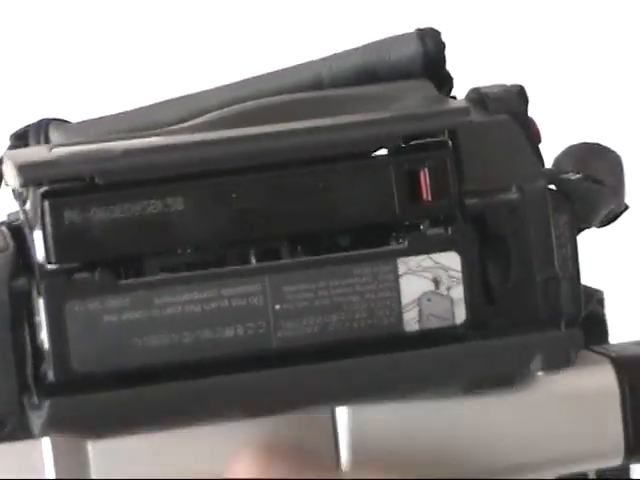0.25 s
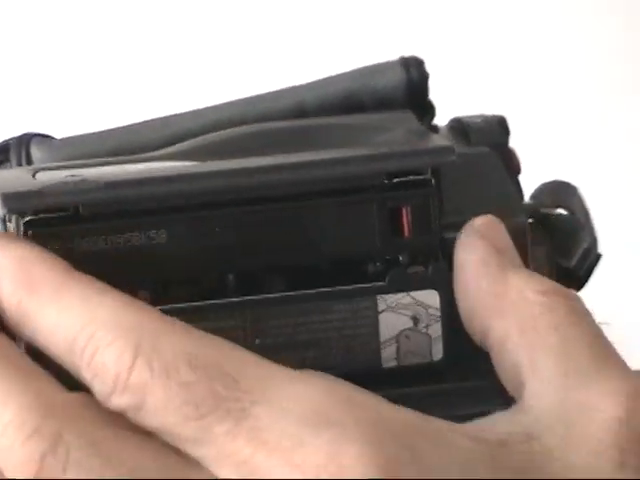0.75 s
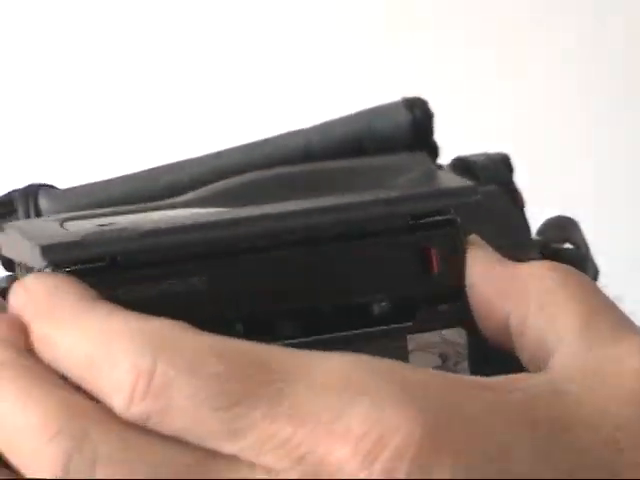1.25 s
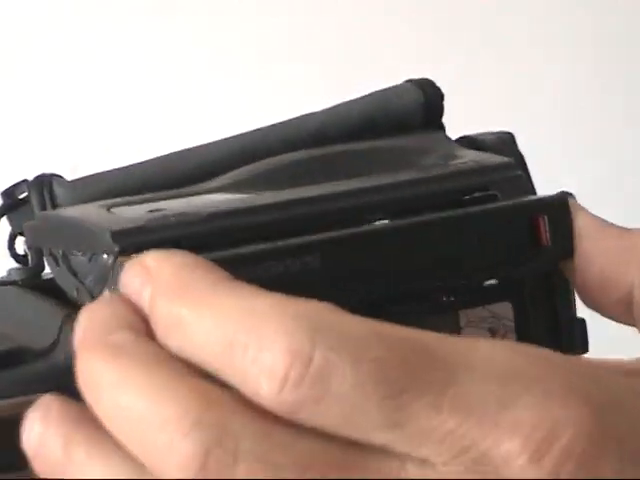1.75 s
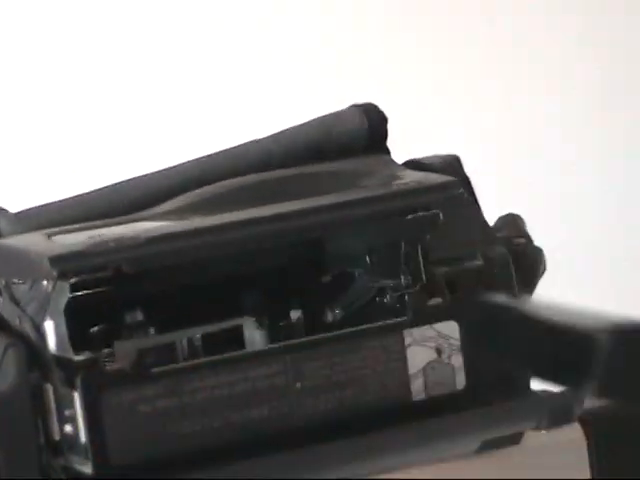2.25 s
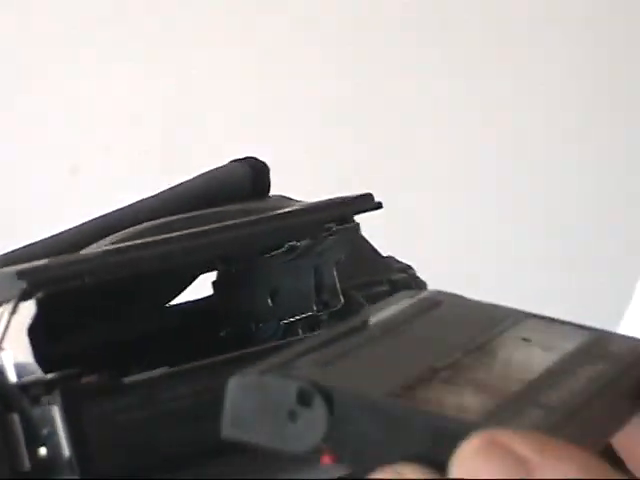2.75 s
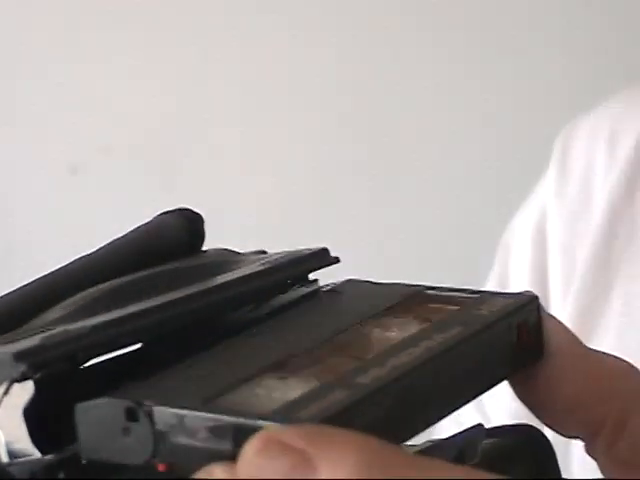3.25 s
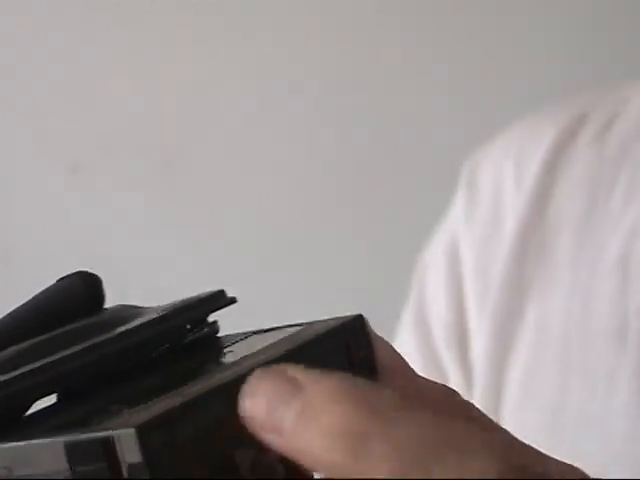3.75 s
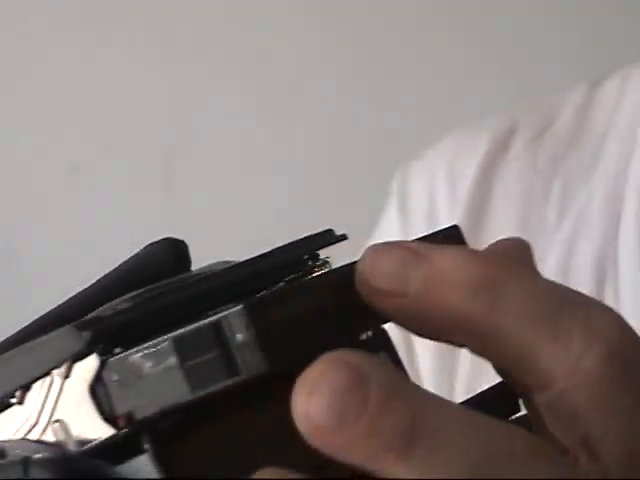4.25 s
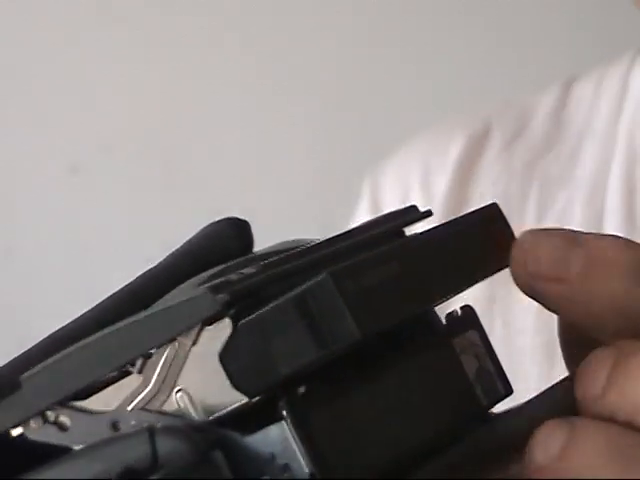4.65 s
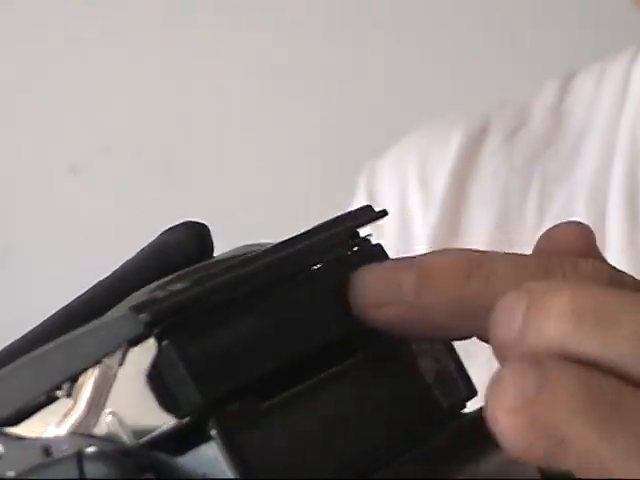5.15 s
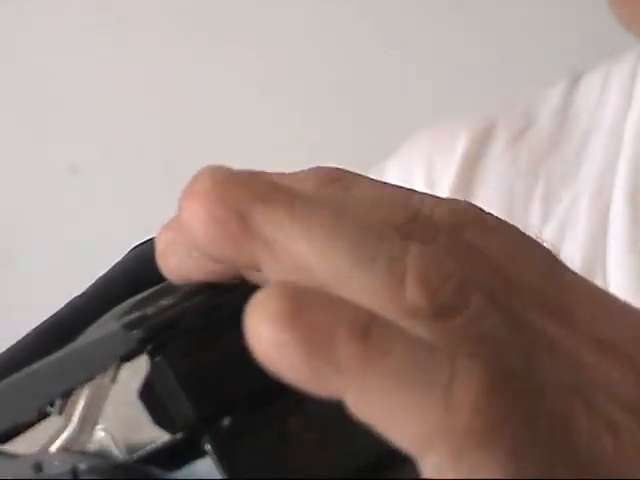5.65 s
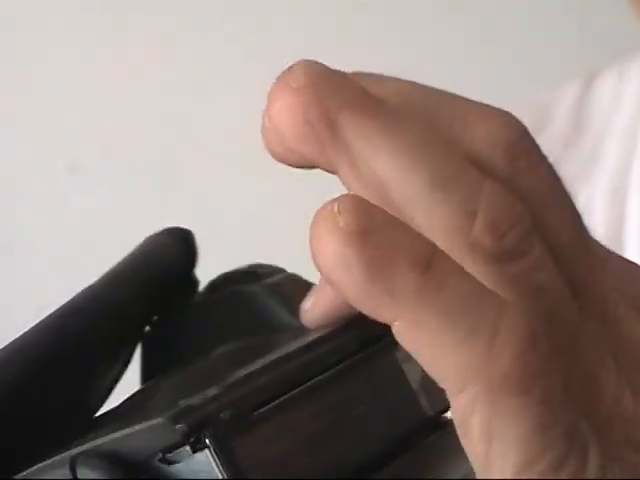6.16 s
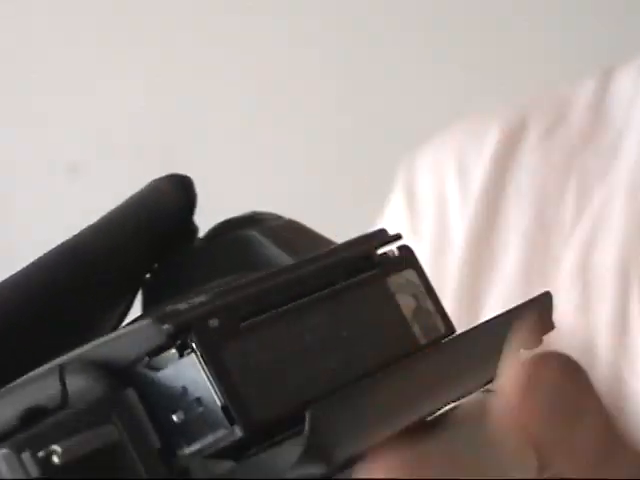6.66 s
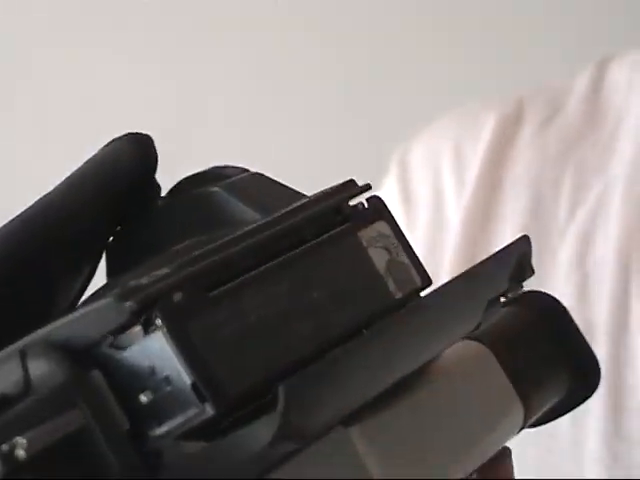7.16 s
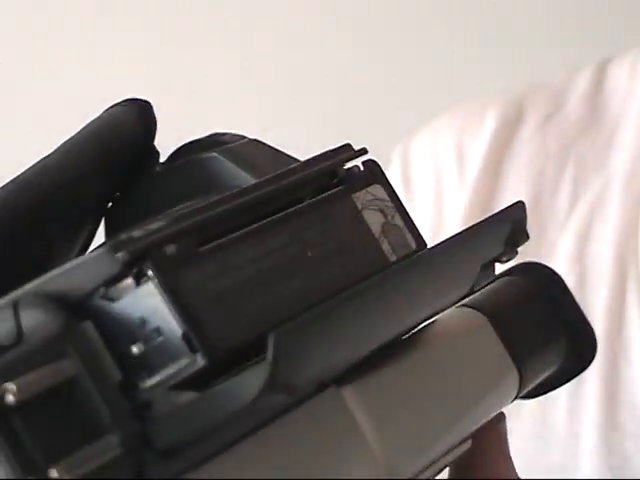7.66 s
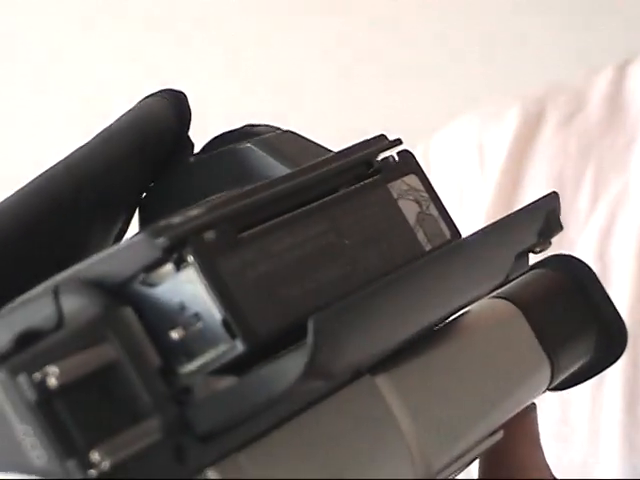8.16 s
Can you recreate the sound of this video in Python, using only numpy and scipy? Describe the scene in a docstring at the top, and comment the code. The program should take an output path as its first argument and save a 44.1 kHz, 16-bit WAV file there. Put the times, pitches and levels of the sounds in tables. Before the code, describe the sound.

Hands swap a tape in a small camcorder: light rattles, sliding plastic, one sharp hard snap, a second clack, and steady whirring hiss behind.

```python
"""Cassette changed in a camcorder

Small room, microphone close: hands pull a cassette out, slide it in again, snap the carriage shut and latch it.
Rough forces ring the small parts, hollow case, panels and sharp edges; a hand brushes the shell as soft noise.
The room returns a near echo and a tail of about half a second.
Behind it all, wavering sine lines make the whine of the tape drive, and noise makes a steady, throbbing hiss."""
import sys
import numpy as np
from scipy import signal
from scipy.fft import rfft, irfft
from scipy.io import wavfile

SR = 44100
rng = np.random.default_rng(int(sys.argv[2]) if len(sys.argv) > 2 else 0)


def pcm_store(signal):
    """Save signal as 16-bit PCM."""
    levels = np.round(np.clip(np.atleast_2d(signal), -1, 1) * 32767)
    wavfile.write(sys.argv[1], SR, levels.astype(np.int16).T)


N = 370440  # 8.4 s
DRUM_HZ = 149.9  # turning rate of the tape drum

# Parts meeting, close to the microphone: cassette out from 1.4 s, in from 3.1 s, carriage shut at 5.06 s,
# pressed down and latched from 6.0 s. Columns: t/s, crack level/dB, kind of touch
CLICKS = [(0.294, -41, "click"), (0.3005, -43, "click"), (0.3645, -39, "click"), (0.3705, -37.5, "click"),
          (0.3825, -42, "snap"), (0.6795, -51.5, "tap"), (0.7928, -42.5, "tap"), (1.3955, -49.5, "knock"),
          (1.4432, -44, "click"), (1.7148, -42.5, "tap"), (1.7795, -44.5, "knock"), (1.8772, -47, "tap"),
          (3.0925, -39, "tap"), (3.1692, -32.5, "tap"), (3.2386, -44, "knock"), (3.2656, -40.5, "tap"),
          (3.382, -46.5, "slam"), (3.4075, -33.5, "knock"), (3.4105, -33.5, "tap"), (3.4297, -36, "tap"),
          (3.44, -43.5, "clack"), (3.474, -48, "clack"), (3.8507, -51.5, "knock"), (3.9072, -47.5, "knock"),
          (3.9425, -38, "knock"), (3.9555, -40, "slam"), (4.381, -37.5, "knock"), (4.3875, -38.5, "snap"),
          (4.4135, -41, "slam"), (4.7722, -51, "knock"), (5.047, -40, "knock"), (5.059, -29.5, "snap"),
          (5.0626, -12, "snap"), (5.0743, -25, "slam"), (5.441, -45.5, "knock"), (6.0185, -42.5, "tap"),
          (6.0258, -43.5, "slam"), (6.0647, -31, "snap"), (6.079, -38, "snap"), (6.0963, -37.5, "slam"),
          (6.1135, -35, "clack"), (6.1155, -26, "slam"), (6.1237, -17.5, "slam"), (6.1275, -18.5, "snap"),
          (6.3706, -37, "latch"), (6.4143, -44.5, "knock"), (6.4274, -52, "slam"), (6.8485, -52, "latch"),
          (6.8938, -36.5, "latch")]
# How plastic meets plastic, by kind.
# Columns: case knock, panel clack, bright edge (each level/dB re the crack), chatter decay t/s
TOUCH = {"click": (-9, -14, -10, 0.0032), "tap": (-18, -1, -6, 0.0024), "knock": (3, 1.5, -13, 0.0026),
         "clack": (7, 14, -11, 0.003), "snap": (-4.5, -8, 1, 0.0045), "slam": (-0.5, -2, 2.5, 0.0027),
         "latch": (-24, -26, 4, 0.0026)}


def clicks(responses, rise_s=0.00027, lasts_s=.0058, push=0.6):
    """Each click is a short central push and a chatter of tiny contacts that dies away within milliseconds."""
    out = np.zeros((2, N))
    t = np.arange(2048) / SR
    # the push lasts 0.7 ms and begins 0.7 ms after the chatter
    push_shape = np.sin(np.pi * np.clip(t / .0007 - 1, 0, 1)) ** 2
    blow = np.outer([push, 0], push_shape)
    chatter = rng.standard_normal((len(CLICKS), 2, len(t)))
    for (start_s, db, kind), noise in zip(CLICKS, chatter):
        *parts_db, decay_s = TOUCH[kind]
        envelope = (1 - np.exp(-t / rise_s)) * np.exp(-t / decay_s)
        force = blow + noise * envelope
        add(out, start_s, contact(force, lasts_s, db, parts_db, responses))
    return out


# Plastic sliding on plastic, close by. Columns: start t/s, end t/s, scrape level/dB, way of sliding
SLIDES = [(0.39, 0.46, -57, "light"), (0.61, 0.68, -58.5, "light"), (1.38, 1.53, -56, "firm"),
          (1.66, 1.79, -53.5, "firm"), (1.76, 1.9, -50, "firm"), (3.08, 3.2, -57, "firm"),
          (3.23, 3.34, -61.5, "hollow"), (3.385, 3.46, -45.5, "firm"), (3.42, 3.521, -52, "hollow"),
          (3.915, 3.997, -43, "firm"), (4.371, 4.407, -36, "light"), (4.393, 4.457, -42, "firm"),
          (5.0, 5.06, -47.5, "firm"), (5.035, 5.066, -37.5, "firm"), (5.39, 5.5, -54, "light"),
          (6.012, 6.067, -53, "firm"), (6.049, 6.135, -39, "firm"), (6.375, 6.41, -56, "firm"),
          (6.82, 6.89, -59, "light")]
# How the parts answer each way of sliding. Columns: case knock, panel clack, bright edge (level/dB re the scrape)
RUB = {"light": (-6, -6, -3), "firm": (1.5, -0.5, -5.5), "hollow": (15, 11, -6)}


def slides(responses, slips_per_s=1600, slip_db=4.5, smooth=0.27, fullness=0.36):
    """Sliding parts stick and slip: uneven little catches over a smooth rub, swelling and fading."""
    out = np.zeros((2, N))
    caught = rng.random(N) < slips_per_s / SR
    catch_gain = amp(slip_db * np.minimum(rng.exponential(1, N), 3))
    friction = (caught * catch_gain + smooth) * rng.standard_normal((2, N))
    for start_s, end_s, db, kind in SLIDES:
        force = friction[:, round(start_s * SR):round(end_s * SR)]
        stroke = np.sin(np.linspace(0, np.pi, force.shape[1]))
        lasts_s = fullness * len(stroke) / SR
        add(out, start_s, contact(force * stroke, lasts_s, db, RUB[kind], responses))
    return out


# The carriage snapping shut jolts the whole body. Columns: t/s, level/dB rms
JOLTS = [(5.063, -41.5)]
# The dull push of a jolt. Columns: f/Hz, level/dB
JOLT_COLOUR = [(15, -4), (40, -2), (90, -2.5), (190, -20.5), (300, 2), (400, -1), (540, 15.5), (700, -2.5),
               (1500, -44.5), (4000, -72)]


def jolts(decay_s=0.013):
    """A short, low shudder of the body: dying noise in a dull colour, alike in both channels."""
    out = np.zeros((2, N))
    t = np.arange(2048) / SR
    for start_s, db in JOLTS:
        dying_noise = rng.standard_normal(len(t)) * np.exp(-t / decay_s)
        push = np.convolve(dying_noise, causal(JOLT_COLOUR, size=2048))[:len(t)]
        add(out, start_s, amp(db) * np.array([unit(push)] * 2))
    return out


# A hand brushing along the cassette as it is turned, close by. Columns: t/s, level/dB
BRUSH = [(2.56, -71), (2.615, -48.5), (2.65, -45), (2.69, -42), (2.725, -44.5), (2.755, -53.5), (2.82, -64)]
# Colour of skin on the shell. Columns: f/Hz, level/dB
BRUSH_COLOUR = [(150, -23), (350, -11), (800, -7.5), (1500, -3.5), (2900, -8), (4600, -2), (6000, -8),
                (7200, -10.5), (8200, -18.5), (9600, -15), (12500, -29.5), (16000, -32)]


def brush(side_db=-10, patchy_db=0.7):
    """Skin sliding over the smooth shell: a soft, slightly patchy swish of noise."""
    times_s, levels_db = np.transpose(BRUSH)
    level_db = np.interp(np.arange(N) / SR, times_s, levels_db, left=-120, right=-120)
    level_db = level_db + patchy_db * drift(90)
    swish = unit(colour(rng.standard_normal((2, N)), BRUSH_COLOUR))
    return amp(level_db) * spread(swish, side_db)


# The crowded modes of small stiff parts. Columns: f/Hz, level/dB
CRACK = [(30, -25.5), (200, -48), (600, -18), (1200, -11.5), (1700, 2), (2200, 1), (2700, 1.5), (3600, 2),
         (5600, -3), (6800, -21.5), (9000, -44.5)]
# Lingering rings of the stiff metal frame and its springs. Columns: f/Hz, width f/Hz, level/dB re the crack
FRAME = [(1834, 32, -23), (2119, 22, -19.5), (2327, 40, -20), (3850, 28, -23), (4190, 26, -21.5),
         (5070, 35, -19.5), (6350, 70, -20), (7940, 65, -18.5), (10000, 70, -23)]
# Resonances of the hollow case. Columns: f/Hz, width f/Hz, level/dB
CASE = [(315, 80, -20.5), (522, 40.5, -5), (648, 110.5, -2.5), (810, 73, 7.5), (934, 70.3, -2)]
# Resonances of the thin plastic panels. Columns: f/Hz, width f/Hz, level/dB
PANELS = [(1093, 82, -1), (1180, 170, -6), (1258, 70, -1.5), (1437, 60, -4.5), (1595, 64, -4.5)]
# The sharpest edges of the small parts. Columns: f/Hz, level/dB
EDGE = [(3500, -49.5), (5400, -5.5), (6300, 0.5), (7400, -2.5), (8300, -1), (10200, -1), (12000, -10.5),
        (14000, -17), (16000, -29)]


def plastic():
    """Impulse responses of the small parts with their ringing frame, the hollow case, the panels and the edges."""
    t = np.arange(2048) / SR
    crack = unit(causal(CRACK, size=2048))
    rings = 0
    for hz, width_hz, db in FRAME:
        ring = np.exp(-np.pi * width_hz * t) * np.sin(2 * np.pi * hz * t)
        rings = rings + amp(db) * unit(ring)
    return crack + rings, modes(CASE), modes(PANELS), causal(EDGE)


def modes(table):
    """Impulse response of a few damped modes; their skirts fall away steeply on both sides."""
    t = np.arange(2048) / SR
    ring = 0
    for k, (hz, width_hz, db) in enumerate(table):
        sign = (-1) ** k  # neighbouring modes start in opposite directions
        damped = np.exp(-np.pi * width_hz * t) * np.sin(2 * np.pi * hz * t)
        ring = ring + sign * amp(db) * width_hz * damped
    edges_hz = [.8 * table[0][0], 1.25 * table[-1][0]]
    skirts = signal.butter(2, edges_hz, "bandpass", fs=SR, output="sos")
    return signal.sosfilt(skirts, ring)


def contact(force, lasts_s, db, parts_db, responses, sides_db=(-15, -25, -18, -11)):
    """A rough force rings each part at its own level; the case is narrowest in stereo, the bright edge widest."""
    out = 0
    length = force.shape[1] + 2048
    padded = np.pad(force, ((0, 0), (0, 2048)))
    for part_db, response, side_db in zip([0, *parts_db], responses, sides_db):
        ring = signal.fftconvolve(padded, response[None], axes=1)[:, :length]
        # energy of a sound of rms 1 that lasts lasts_s
        energy = np.sum(ring ** 2, axis=1, keepdims=True)
        ring *= np.sqrt(lasts_s * SR / (energy + 1e-20))
        out = out + amp(db + part_db) * spread(ring, side_db)
    return out


def room(x, steady=.55):
    """The low notes feed the room evenly; part of the highs alternates between two other paths, 130 times a second."""
    high = colour(x, [(1, -80), (1300, -40), (1700, 0), (20000, 0)])
    turn = 2 * np.pi * 130 * np.arange(N) / SR
    flicker = np.sqrt(1 - steady ** 2) * high
    feeds = x - (1 - steady) * high, flicker * np.cos(turn), flicker * np.sin(turn)
    # each feed has a room response of its own
    return sum(signal.fftconvolve(feed, room_response(), axes=1)[:, :N] for feed in feeds)


# Time for the small room's tail to fall 60 dB. Columns: f/Hz, t/s
ROOM_T60 = [(200, 0.39), (900, .5), (2500, 0.48), (5500, 0.45), (10000, 0.44), (16000, 0.21)]
# Colour of the room. Columns: f/Hz, level/dB
ROOM_COLOUR = [(100, -4.5), (500, 3), (780, -4), (950, 4), (1200, 1.5), (2500, 3), (5500, -1), (9000, -8),
               (16000, 4.5)]


def room_response(wet_db=-9.0, early_db=-14, echo_s=.0108, echo_decay_s=0.0028, build_s=0.0038, side_db=-8):
    """A near surface throws the sound back once; the room's tail builds and dies, the top treble fastest."""
    t = np.arange(SR) / SR
    # about 5000 random reflections a second
    taps = rng.choice([-1., 1.], (2, SR)) * (rng.random((2, SR)) < 5000 / SR)
    hz, frame_s, z = signal.stft(taps, SR, nperseg=256)
    fall_db = 60 * frame_s / read(ROOM_T60, hz)[:, None]
    z = z * amp(read(ROOM_COLOUR, hz)[:, None] - fall_db)
    diffuse = signal.istft(z, SR, nperseg=256)[1][:, :SR]
    tail = diffuse * (1 - np.exp(-(t / build_s) ** 2))
    echo = diffuse * (t > echo_s) * np.exp(-abs(t - echo_s) / echo_decay_s)
    tail = amp(wet_db) * tail / np.linalg.norm(tail[0])
    echo = amp(early_db) * echo / np.linalg.norm(echo[0])
    return spread(tail + echo, side_db)


def whine(waver_db=1.3, wander_rad=.6, trim_db=-1, port_phase_rad=.5):
    """Thin sine lines of the tape drive, each wavering a little in level and phase."""
    t = np.arange(N) / SR
    out = np.zeros((2, N))
    for hz, db in drive_lines():
        phase = 2 * np.pi * hz * t + wander_rad * drift(14)
        level = amp(db + trim_db + waver_db * drift(8.7))
        offset = port_phase_rad * rng.standard_normal((2, 1))  # left and right differ
        out += level * np.sqrt(2) * np.sin(phase + offset)
    return out


# Hum of the tape drive and single tones of its gears. Columns: f/Hz, level/dB rms before the whine's trim
HUM = [(120, -72), (148, -71.5), (298, -66.5), (524, -73.5), (1141, -68), (3140, -73.5), (3365, -69),
       (4260, -75)]
# Whines of the drive with sidebands spaced by the drum's turning rate.
# Columns: centre f/Hz, level/dB rms before the whine's trim, fall per sideband level/dB
WHINE = [(1873, -69.5, 1.5), (2622, -64.5, 3), (3819, -72, 7), (5769, -80, 1.5)]


def drive_lines(count=2):
    """The hum, and each whine with the sidebands that the turning drum gives it: rows of f/Hz, level/dB."""
    lines = list(HUM)
    for hz, db, fall_db in WHINE:
        for k in range(-count, count + 1):
            lines.append((hz + k * DRUM_HZ, db - fall_db * abs(k)))
    return lines


# Colour of the steady hiss. Columns: f/Hz, relative level/dB per Hz
HISS = [(20, -5.5), (60, -1.5), (130, -3.5), (200, -4.5), (320, -1), (800, -3.4), (1400, -6.5), (2500, -9),
        (3400, -12.5), (4300, -11), (5100, -17.5), (6300, -18), (7500, -21.0), (16000, -28)]
# Left-right likeness of the hiss. Columns: f/Hz, correlation (1 = alike, 0 = unrelated)
HISS_SAME = [(60, 0.06), (130, 0.18), (290, 0.33), (640, 0.43), (1410, 0.17), (3100, 0.54), (6820, 0.17),
             (15000, -0.15)]
# Balance of the hiss. Columns: f/Hz, left minus right level/dB
HISS_SIDE = [(60, -2.0), (110, -2.0), (200, -0.43), (380, -1.5), (700, -0.5), (1290, -1.5), (2380, -2.0),
             (4400, 0.0), (8120, -0.5), (15000, 0.5)]


def hiss(level_db=-54.08, throb=.2):
    """Steady noise, widest in the deep bass and top treble; its upper part throbs with every turn of the drum."""
    hz = np.fft.rfftfreq(N, 1 / SR)
    a, b = rfft(rng.standard_normal((2, N)))
    same = read(HISS_SAME, hz)
    right = same * a + np.sqrt(1 - same ** 2) * b
    balance = amp(np.outer([.5, -.5], read(HISS_SIDE, hz)))
    noise = colour(irfft(np.array([a, right]) * balance, N), HISS)
    upper = signal.sosfilt(signal.butter(1, 1200, "highpass", fs=SR, output="sos"), noise)
    turn = 2 * np.pi * DRUM_HZ * np.arange(N) / SR
    noise = noise + throb * upper * (np.cos(turn) + np.cos(2 * turn))
    return amp(level_db) * noise / np.std(noise.mean(0))


def amp(db):
    """Decibels to gain."""
    return 10 ** (np.asarray(db) / 20)


def unit(x):
    """Scales to rms 1."""
    return x / np.sqrt(np.mean(x ** 2) + 1e-20)


def read(points, hz):
    """Reads a table on a log-frequency axis."""
    f, value = np.transpose(points)
    return np.interp(np.log(hz + 1), np.log(f + 1), value)


def add(mix, start_s, sound):
    """Lays a stereo sound into the mix at its start time."""
    part = mix[:, round(start_s * SR):][:, :sound.shape[1]]
    part += sound[:, :part.shape[1]]


def colour(x, points):
    """Filters a full-length sound by the spectrum of a table."""
    gain = amp(read(points, np.fft.rfftfreq(N, 1 / SR)))
    return irfft(rfft(x) * gain, N)


def causal(points, size=1024):
    """The minimum-phase impulse response with the spectrum of a table: its energy comes as early as it can."""
    log_gain = np.log(amp(read(points, abs(np.fft.fftfreq(size, 1 / SR)))))
    return np.fft.ifft(np.exp(np.conj(signal.hilbert(log_gain)))).real


def drift(per_s):
    """Random wandering of rms 1, with a new target per_s times a second."""
    knots = rng.standard_normal(1024)
    return unit(np.interp(np.arange(N) / SR * per_s, np.arange(len(knots)), knots))


def spread(pair, side_db):
    """Two sounds as middle and weaker side of a stereo pair."""
    mid, side = pair[0], amp(side_db) * pair[1]
    return np.array([mid + side, mid - side])


def scene():
    """The handling in its room, over the running tape drive."""
    responses = plastic()
    handling = clicks(responses) + slides(responses) + jolts() + brush()
    return handling + room(handling) + hiss() + whine()


def record(dry):
    """Peaks beyond 0.88 of full scale clip; then a steep low-pass removes the top."""
    clipped = np.clip(dry, -.88, .88)
    low_pass = signal.firwin(601, 16050, window=("kaiser", 9), fs=SR)  # cutoff in Hz
    return signal.oaconvolve(clipped, low_pass[None], "same")


dry = scene()
out = record(dry)
pcm_store(out)
```